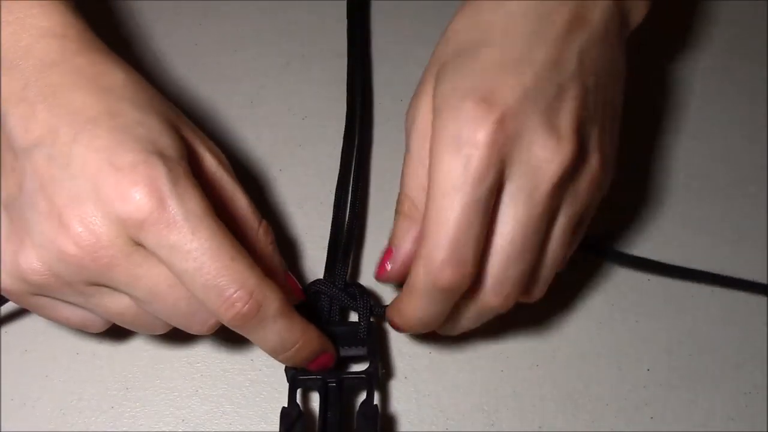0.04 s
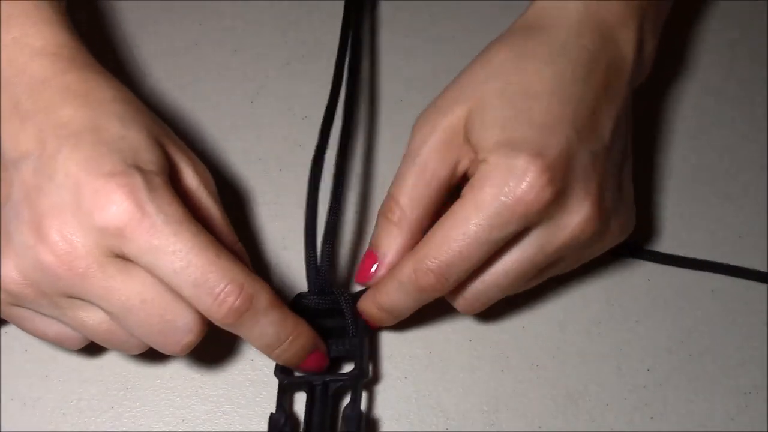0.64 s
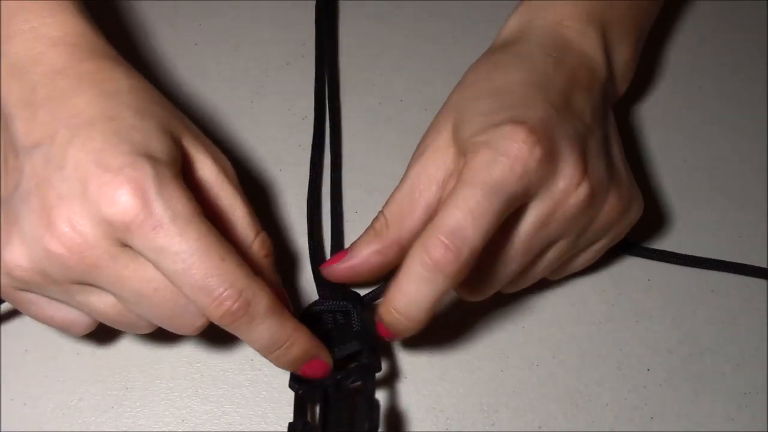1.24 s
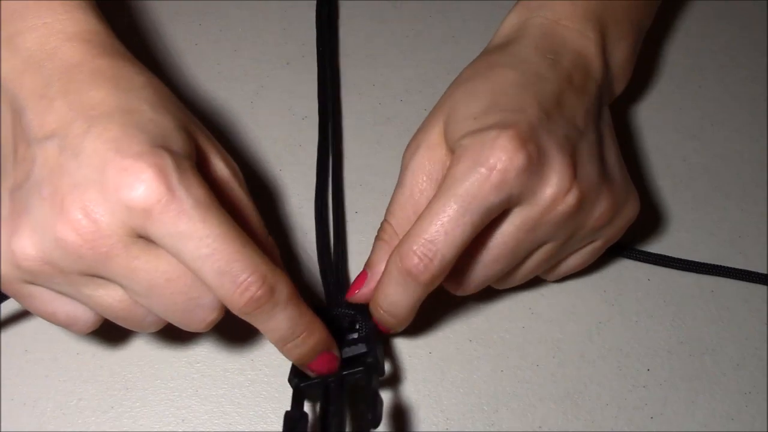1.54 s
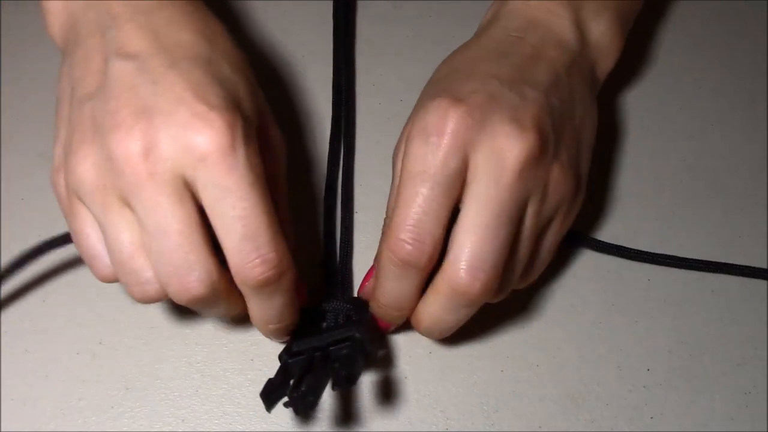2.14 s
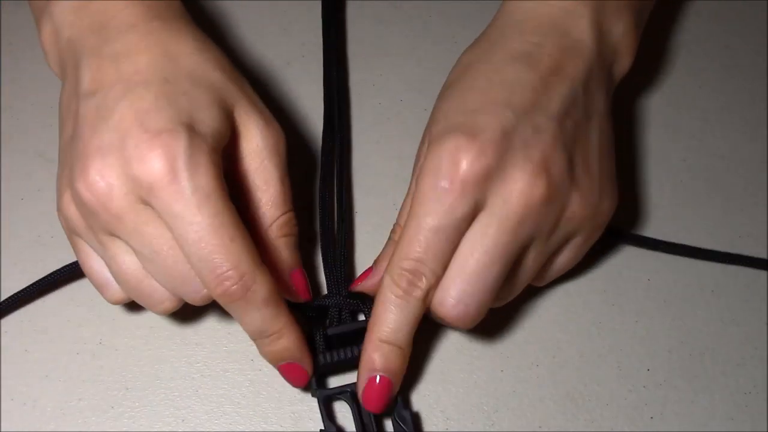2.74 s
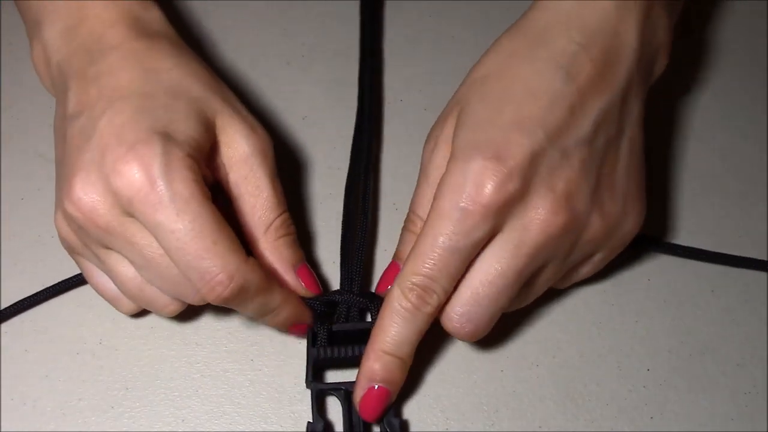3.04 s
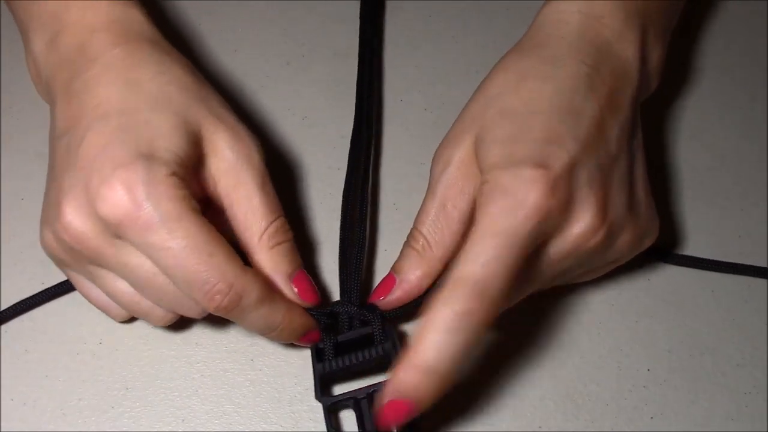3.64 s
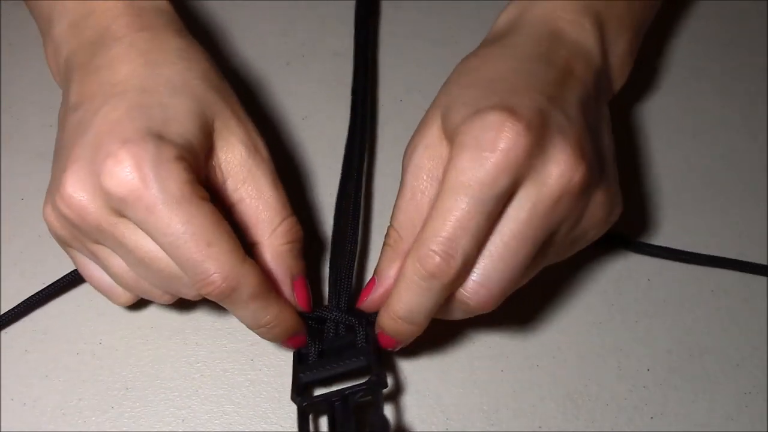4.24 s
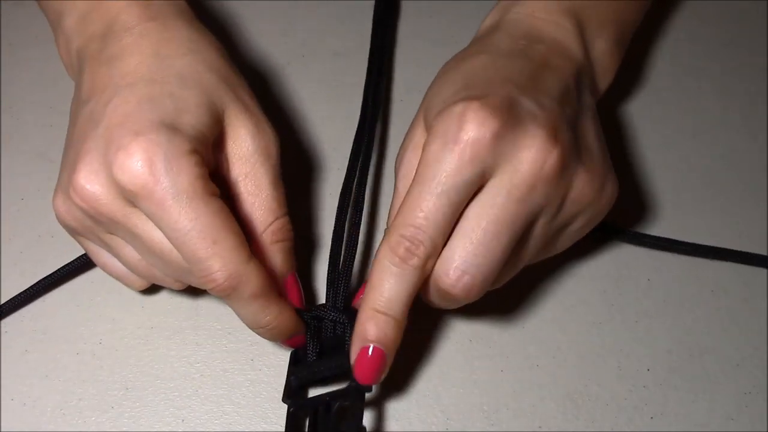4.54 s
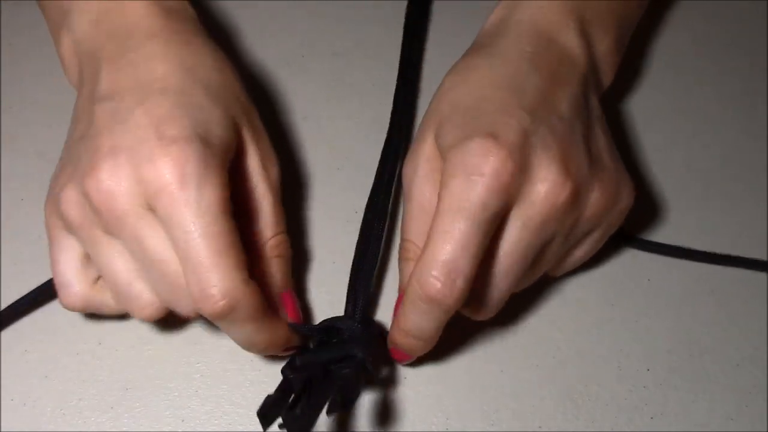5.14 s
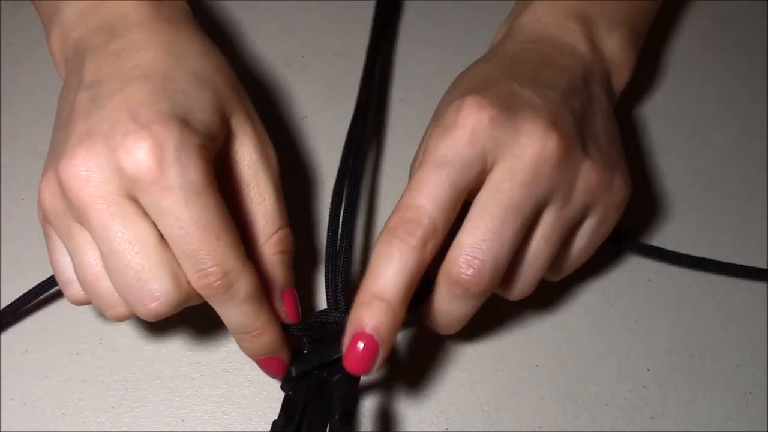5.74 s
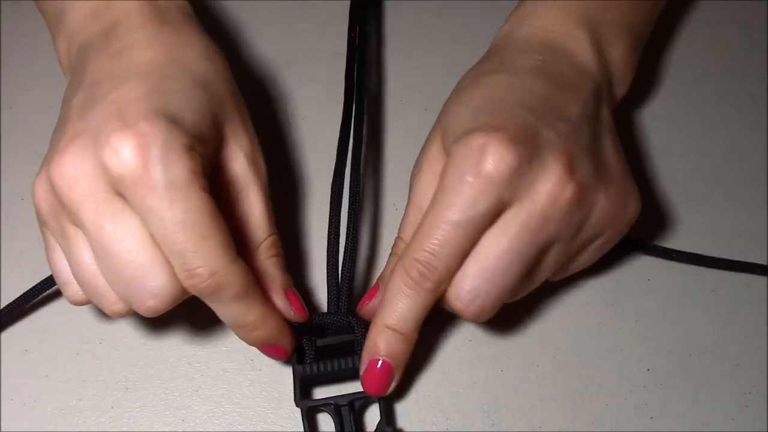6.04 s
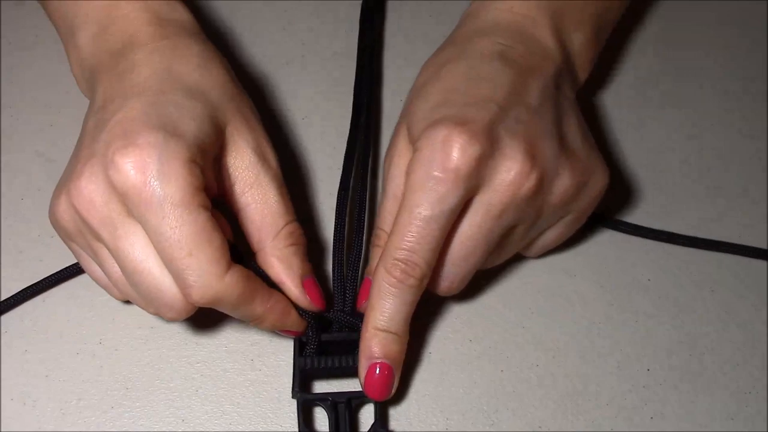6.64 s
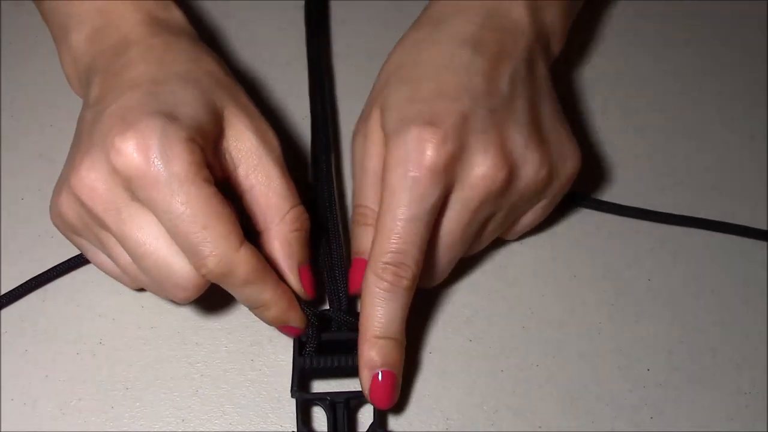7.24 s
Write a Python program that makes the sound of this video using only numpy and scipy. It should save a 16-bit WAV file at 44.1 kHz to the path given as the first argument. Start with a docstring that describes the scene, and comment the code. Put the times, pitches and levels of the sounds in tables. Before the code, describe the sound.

A short rasp of nylon cord and a soft finger bump open the sound, close by, over the faint hush of a small room. The cord keeps rubbing across a table and a plastic buckle in short, uneven strokes, hissing as it tightens and sometimes taking on a hollow, singing tone. Light buckle ticks and tiny flicks of snagged strands are scattered between the strokes. At about 2 seconds, a cluster of clicks comes with a hard finger landing that makes the tabletop boom briefly. A sharp plastic click follows near 2.7 seconds, then more scraping and ticking around 3.8. At about 4.7 seconds the cord zips taut, and at 5 the buckle drops flat with a bright slap and a few small ticks. More rubbing comes near 5.8 seconds, a softer table boom at 6.6 and another rasp at 6.8, with faint handling until about 7.5.

```python
"""First comes a short rasp of nylon cord and a soft finger bump, over the hush of a small quiet room.
Hands are knotting the cord onto a plastic buckle that lies on a table. The braid rasps as it catches
on table and buckle, sings where it is gripped, and hisses as it is drawn tight. The buckle ticks
against nails and table top, strands snag and flick free, and two hard finger landings make the table
boom. About five seconds in, just after a taut pull, the buckle drops flat with a bright slap."""
import sys
import numpy as np
from scipy import signal
from scipy.fft import rfft, irfft
from scipy.io import wavfile

SR = 44100
rng = np.random.default_rng(int(sys.argv[2]) if len(sys.argv) > 2 else 0)


def store_wav(level_fs):
    """Save 16-bit WAV to argv[1]."""
    pcm = np.round(np.clip(np.atleast_2d(level_fs), -1, 1) * 32767)
    wavfile.write(sys.argv[1], SR, pcm.T.astype(np.int16))


N = 330730


def amp(db):
    """Turns decibels into a number to multiply a sound by."""
    return 10 ** (np.asarray(db) / 20)


def value_at(points, hz):
    """Looks up a table's value at any frequency, blending between its rows on a log scale."""
    row_hz, value = np.transpose(points)
    return np.interp(np.log(hz + 1), np.log(row_hz + 1), value)


def add(mix, start_s, sound):
    """Lays a sound into the mix at its start time."""
    part = mix[round(start_s * SR):][:len(sound)]
    part += sound[:len(part)]


def unit_level(x):
    """Scales a sound so that its average level (rms) is 1."""
    return x / np.sqrt(np.mean(x ** 2) + 1e-20)


def unit_hit(x):
    """Scales a short sound to the energy of 10 ms at level 1."""
    return x / np.sqrt(np.sum(x ** 2) / (SR / 100) + 1e-20)


def lows(x, edge_hz):
    """Keeps the part of a sound below this frequency."""
    hz = np.fft.rfftfreq(N, 1 / SR)
    return irfft(rfft(x) / (1 + (hz / edge_hz) ** 6), N)


def thinned(x, edge_hz):
    """Weakens the bass: a brief hard contact gives little push below this frequency."""
    return signal.lfilter(*signal.butter(1, edge_hz, "high", fs=SR), x)


def through(x, colour, modes=(), size=4096):
    """Plays x through an object with a colour (its bass and treble) and modes (pitches where it rings)."""
    hz = abs(np.fft.fftfreq(size, 1 / SR))
    lift_db = sum(lift / (1 + (2 * (hz - centre) / width) ** 2) for centre, width, lift in modes)
    log_gain = np.log(amp(value_at(colour, hz) + lift_db))
    spectrum = np.exp(np.conj(signal.hilbert(log_gain)))  # makes the ringing come after the push
    response = np.fft.ifft(spectrum).real[:size // 2]
    return signal.oaconvolve(x, response)[:len(x)]


def near_echo(x, delay_s, echo_db):
    """A surface close by throws the sound straight back, which makes it hollow."""
    samples = np.arange(len(x))
    echo = np.interp(samples - delay_s * SR, samples, x, left=0)
    return (x + amp(echo_db) * echo) / np.sqrt(1 + amp(echo_db) ** 2)


def wander(rate_hz):
    """A smooth random wobble that changes up to about this fast."""
    return unit_level(lows(rng.standard_normal(N), rate_hz))


def friction(slips_per_s, spread_db, smooth, uneven_db, uneven_hz):
    """Tiny slips of unequal size over a smooth rub, bunched up as the grip catches and lets go."""
    sizes = amp(spread_db * np.minimum(rng.exponential(1, N), 4)) * rng.choice([-1, 1], N)
    slips = unit_level(sizes * (rng.random(N) < slips_per_s / SR))
    rub = smooth * rng.standard_normal(N)
    return (slips + rub) * amp(uneven_db * wander(uneven_hz))


def gestures(rows, column, rise_s, fall_s, idle_db, drift_db=5.5):
    """Loudness over time: each move swells, holds and fades, and the hands are never quite still."""
    t = np.arange(0, N, 32) / SR
    power = amp(idle_db + drift_db * wander(rate_hz=10.3)[::32]) ** 2
    for row in rows:
        peak_s, held_s = row[:2]
        early, late = np.maximum(peak_s - t, 0), np.maximum(t - peak_s - held_s, 0)
        power += (amp(row[column]) * np.exp(-early / rise_s - late / fall_s)) ** 2
    return np.interp(np.arange(N) / SR, t, np.sqrt(power))


def contact(t, chatter, chatter_s):
    """One sharp blow, then a brief chatter of the two surfaces."""
    rattle = rng.standard_normal(len(t)) * np.exp(-t / chatter_s)
    return (t == 0) + chatter * rattle / np.linalg.norm(rattle)


# Strokes of the cord. Each row: time it reaches full speed in seconds, seconds held,
# relative level on the table in dB, relative level on the buckle in dB.
STROKES = [(0.0, 0.0086, -40, -46.5), (0.17, 0.029, -49, -46), (0.23, 0.15, -58.5, -58),
           (0.43, 0.12, -43.5, -47), (0.628, 0.012, -65, -49), (0.68, 0.19, -42.5, -50.5),
           (0.82, 0.076, -34, -43), (1.2, 0.19, -45.5, -62), (1.75, 0.15, -47.5, -56.5),
           (1.985, 0.03, -30.5, -30.5), (2.04, 0.079, -42, -44), (2.19, 0.093, -45.5, -50.5),
           (2.57, 0.15, -44.5, -67), (2.862, .24, -36.5, -42), (3.183, 0.0099, -49, -39),
           (3.225, 0.017, -42, -66), (3.71, 0.078, -50, -47.5), (3.805, 0.0085, -38, -54),
           (3.87, 0.013, -31, -34.5), (3.96, 0.16, -47, -55.5), (4.275, 0.033, -37, -48),
           (4.46, 0.0052, -38.5, -54), (4.59, 0.15, -42, -49), (4.7, 0.12, -36.5, -43),
           (4.84, 0.072, -45, -56), (4.925, 0.036, -38, -43), (4.985, 0.0098, -27, -30),
           (5.04, 0.0077, -26, -30.5), (5.16, 0.011, -33, -48), (5.24, 0.04, -61, -43),
           (5.3, 0.091, -35, -41), (5.475, 0.0056, -38, -36), (5.52, 0.056, -38, -53.5),
           (5.74, 0.012, -31, -41.5), (5.81, 0.11, -34.5, -41), (6.125, 0.0065, -49.5, -74),
           (6.525, 0.0091, -45.5, -52.5), (6.78, 0.091, -38, -44.5), (6.835, 0.095, -30, -48.5),
           (7.275, 0.012, -37, -45), (7.47, .03, -58, -57)]
# Nylon sliding on nylon. Each row: time at full speed in seconds, seconds held, relative level in dB.
SLIDES = [(0.2, .02, -72), (0.35, 0.12, -67), (1.28, 0.014, -61), (1.72, .08, -69), (1.955, 0.082, -57),
          (2.24, 0.047, -65.5), (2.42, 0.006, -65.5), (3.68, 0.1, -63), (3.8, 0.075, -58),
          (4.325, .01, -67), (4.625, 0.013, -64.5), (4.72, 0.052, -64), (4.972, .015, -60),
          (5.32, 0.042, -58), (5.47, 0.018, -61), (5.83, 0.054, -81), (6.74, 0.12, -62), (7.29, 0.031, -68)]
# The colours of table top, buckle and fibres. Each row: frequency in Hz, relative level in dB.
TABLE_COLOUR = [(90, -47.5), (290, -11), (370, 4), (490, -4.5), (700, -5.5), (1000, -8.5), (1400, -20),
                (2100, -18.5), (4000, -34), (16000, -65)]
BUCKLE_COLOUR = [(600, -43), (1300, -9.5), (1600, 4.5), (2100, -1.5), (3200, -12.5), (5000, -19.5),
                 (7400, -29), (10000, -44), (16000, -60)]
FIBRE_COLOUR = [(1500, -44), (4000, -8), (6500, 7), (8500, 8.5), (11000, 3.5), (13500, -5), (16000, -12)]
# Where the table, the buckle and a lightly held cord ring.
# Each row: pitch in Hz, width in Hz, boost in dB (a cut if below zero).
TABLE_MODES = [(294.3, 10.5, 13), (451.6, 59, 5.5), (598, 140, 4), (809, 57, 3.5), (1100, 106, 7),
               (1318, 178, 14), (3600, 290, -16)]
BUCKLE_MODES = [(1250, 49, 14), (1600, 520, 10), (1880, 47, 8), (2334, 140, 5.5), (2720, 480, 7.5),
                (3810, 1300, 11), (5600, 340, -1)]
HOLLOW_MODES = [(600, 120, 3.5), (840, 62, 2.5), (1090, 220, 2)]


def rasping_cord():
    """The braid catches on table and buckle in tiny slips, and its fibres hiss."""
    braid = friction(slips_per_s=2200, spread_db=1.5, smooth=1.0, uneven_db=2.0, uneven_hz=120)
    fine = friction(slips_per_s=4000, spread_db=2.0, smooth=1.0, uneven_db=2.0, uneven_hz=120)
    on_table = gestures(STROKES, column=2, rise_s=0.015, fall_s=0.021, idle_db=-58.5)
    on_buckle = gestures(STROKES, column=3, rise_s=0.015, fall_s=0.021, idle_db=-64)
    on_nylon = gestures(SLIDES, column=2, rise_s=0.031, fall_s=0.02, idle_db=-86.5)
    rasp = unit_level(through(braid, TABLE_COLOUR, TABLE_MODES))
    # Only a heavy stroke stirs the table's low notes; a light one stays thin and hollow.
    lightness = 1 - np.clip(on_table / amp(-26), 0, 1)
    flat_colour = [(0, 0), (SR / 2, 0)]
    hollow = through(rasp - lows(rasp, edge_hz=406), flat_colour, HOLLOW_MODES)
    table = ((1 - lightness) * rasp + lightness * hollow) * on_table * amp(-0.5)
    scrape = through(0.5 * braid + 1.46 * fine, BUCKLE_COLOUR, BUCKLE_MODES)
    buckle = unit_level(scrape) * on_buckle * amp(-0.8)
    brushing = np.hypot(on_nylon, on_buckle * amp(-27.5))  # the buckle also brushes the fibres
    fibres = unit_level(through(fine, FIBRE_COLOUR)) * brushing * amp(1)
    return near_echo(table + buckle + fibres, delay_s=0.00186, echo_db=-23.5)


# Fingertips pressing on the table. Each row: landing time in seconds, seconds held, relative level in dB.
PRESSES = [(0.0, .01, -38.5), (0.18, 0.019, -33.5), (0.26, 0.016, -45.5), (0.55, 0.26, -52),
           (0.82, 0.14, -48), (1.27, 0.043, -49.5), (1.66, 0.012, -42), (1.696, 0.0069, -37),
           (1.78, 0.18, -50.5), (2.02, 0.025, -31), (2.08, 0.034, -32.5), (2.25, 0.015, -36.5),
           (2.39, 0.0061, -39.5), (2.425, 0.017, -36), (2.69, 0.029, -46), (2.86, 0.19, -45),
           (3.04, 0.0093, -38), (3.21, 0.015, -42.5), (3.619, 0.011, -39.5), (3.742, 0.035, -39),
           (3.786, .006, -28), (3.86, 0.083, -43.5), (4.01, 0.032, -38.5), (4.455, 0.079, -47.5),
           (4.56, 0.14, -45.5), (5.0, 0.062, -33.5), (5.3, 0.091, -36.5), (5.47, 0.07, -37),
           (5.76, 0.18, -49), (5.915, 0.0071, -39), (5.989, 0.0043, -41), (6.619, 0.0058, -42.5),
           (6.84, 0.053, -47), (7.42, 0.11, -49)]
# The dull colour of a fingertip on the table. Each row: frequency in Hz, relative level in dB.
THUMP_COLOUR = [(30, -34), (70, -18), (100, -2), (240, 0.5), (330, 1), (430, -9.5), (600, -16), (1500, -35),
                (16000, -100)]


def fingers():
    """Soft fingertips land quickly and settle slowly, sounding the low notes of the table."""
    bumps = friction(slips_per_s=300, spread_db=1.5, smooth=0.7, uneven_db=1.2, uneven_hz=30)
    weight = gestures(PRESSES, column=2, rise_s=0.0078, fall_s=0.02, idle_db=-58.5)
    return unit_level(through(bumps, THUMP_COLOUR, TABLE_MODES)) * weight * amp(-0.24)


# The colours of the room's air and of a faint hiss. Each row: frequency in Hz, relative level in dB.
AIR_COLOUR = [(20, -28), (55, -14), (100, -6), (160, 4.5), (300, 1), (600, -4), (1050, -8), (1350, -12),
              (1600, -17.5), (2200, -13.5), (4500, -18.5), (9000, -24.5), (12000, -27.5), (16000, -37)]
HISS_COLOUR = [(25, -44), (120, 2), (500, 1.5), (2000, -11), (6000, -21), (12000, -38.5)]
# A faint hum and two high whines. Each row: pitch in Hz, level in dB.
HUM = [(290.7, -77), (5561, -78), (11047, -83)]


def room_tone(air_db=-56, hiss_db=-62):
    """Steady dull air noise, a hiss that is opposite in left and right, and a wavering hum and whine."""
    air = unit_level(through(rng.standard_normal(N), AIR_COLOUR)) * amp(air_db)
    hiss = unit_level(through(rng.standard_normal(N), HISS_COLOUR)) * amp(hiss_db)
    t, hum = np.arange(N) / SR, np.zeros(N)
    for hz, db in HUM:
        waver = 1.8 * wander(rate_hz=13)
        hum += amp(db) * np.sqrt(2) * np.sin(2 * np.pi * hz * t + waver)
    return air + np.array([hiss, -hiss]) + hum


# The colours of a plastic crack and of its highest part. Each row: frequency in Hz, relative level in dB.
CRACK_COLOUR = [(300, -55), (900, -26), (1300, 12.5), (1800, 7), (2300, 9), (3000, 7.5), (3700, 5),
                (4600, -6), (6000, -8.5), (7200, -25.5), (16000, -48)]
CRACK_TOP_COLOUR = [(2500, -53), (6000, -7), (7800, -0.5), (9300, -1), (11000, -11), (13000, -11),
                    (14500, -28), (16000, -9)]


def crack(force, brightness_db):
    """Hard plastic answers a blow with a bright click and a fine, high edge."""
    click = unit_hit(through(force, CRACK_COLOUR)) * amp(4.5)
    edge = unit_hit(through(force, CRACK_TOP_COLOUR)) * amp(brightness_db - 7)
    return click + edge


# The buckle tapping nails and table. Each row: start in seconds, then relative levels in dB of the thud,
# the table's knock, the buckle's ring, the crack and the crack's brightness, then the ring's pitch in Hz.
TICKS = [(0.1626, -23, -28, -26, -42, -5, 1600), (0.8127, -33, -32, -32, -45.5, -17, 1510),
         (0.817, -40, -24.5, -53, -55, -23, 1600), (0.8864, -30.5, -33, -33.5, -50.5, -4, 1780),
         (1.0147, -43, -49, -42, -61, -19, 1600), (1.0434, -67, -39.5, -51, -62, -20, 1650),
         (1.268, -40, -31, -44, -46, -16, 1700), (1.5519, -42.5, -52, -49, -63, -19, 1670),
         (1.6604, -47, -45.5, -43.5, -71, -21, 1600), (1.968, -31, -32, -28.5, -40, 0, 2000),
         (1.9717, -25, -30.5, -23, -42, -31, 1860), (2.02, -28, -32, -50, -35.5, -5, 1720),
         (2.1443, -60, -39.5, -41, -62, 3, 1690), (2.188, -35, -36.5, -54, -57.5, -18, 1920),
         (2.5252, -37, -34, -31, -46, -10, 1620), (2.648, -42, -42, -37, -47, -12, 1600),
         (2.6523, -53, -31.5, -33.5, -57, -21, 1560), (2.7478, -26, -28.5, -14, -18.5, -5.5, 1630),
         (3.0385, -39, -44, -33, -48, 0, 1630), (3.7435, -37, -43, -49, -50.5, -8, 1500),
         (3.803, -39, -38, -29, -46, -11, 1850), (3.8076, -32, -30, -24, -38, -19, 1670),
         (3.8546, -32, -50, -29.5, -42.5, -5, 1780), (4.0798, -39, -26, -35, -43, -36, 1660),
         (4.193, -69, -39, -47, -69, -25, 1600), (4.2645, -66, -32.5, -67, -59.5, -25, 1500),
         (4.5661, -40, -34, -37, -48.5, -12, 1700), (4.6312, -54, -49, -61, -44.5, -14, 1650),
         (4.9855, -23.5, -14.5, -33, -21.5, -4, 1620), (5.2303, -29.5, -35.5, -34, -39.5, 1.5, 1650),
         (5.2717, -27.5, -30.5, -27.5, -42, -11, 1860), (5.3193, -50, -59, -26.5, -44, -7, 1710),
         (5.343, -28.5, -31.5, -33, -52, 12.5, 1660), (5.386, -56, -43, -32, -64, -17, 1860),
         (5.8429, -38, -27, -27.5, -44.5, -9, 1600), (6.3922, -42, -42.5, -26, -49, -10, 1620),
         (6.62, -37, -48, -43, -57, 6.5, 1630), (7.1107, -47, -48, -32, -57, -24, 1625),
         (7.474, -42.5, -46, -38, -66, -23, 1600)]


def buckle_ticks(ring_s=0.00085):
    """Each tap thuds, knocks, rings and cracks. Gives the direct sound and the sound sent to the room."""
    direct, to_room, t = np.zeros(N), np.zeros(N), np.arange(4096) / SR
    ring_shape = t / ring_s * np.exp(-t / ring_s)  # swells fast, then the fingers damp it
    for start_s, thud_db, knock_db, ring_db, crack_db, brightness_db, ring_hz in TICKS:
        thud = through(contact(t, chatter=1.2, chatter_s=0.02), THUMP_COLOUR, TABLE_MODES)
        thud = unit_hit(thinned(thud, edge_hz=113)) * amp(thud_db)
        knock = through(contact(t, chatter=1.58, chatter_s=0.011), TABLE_COLOUR, TABLE_MODES)
        knock = unit_hit(thinned(knock, edge_hz=890)) * amp(knock_db)
        ring = unit_hit(ring_shape * np.sin(2 * np.pi * ring_hz * t)) * amp(ring_db - 2)
        snap = crack(contact(t, chatter=1.0, chatter_s=0.0024), brightness_db)
        snap = near_echo(snap, delay_s=0.00166, echo_db=-18.5) * amp(crack_db)
        add(direct, start_s, thud + knock + ring + snap)
        # The room gathers the crack from all sides, so its chatter evens out; the hands shield the ring.
        clean_snap = crack(1.0 * (t == 0), brightness_db) * amp(crack_db)
        add(to_room, start_s, thud + knock + ring * amp(-5) + clean_snap)
    return direct, to_room


# Moments when the cord sings. Each row: time at full speed in seconds, seconds held,
# relative level in dB, pitch in Hz, width of the band of noise in Hz.
SINGS = [(0.44, .12, -39.5, 580, 68), (0.67, 0.14, -46.5, 605, 90), (0.44, 0.12, -46, 1103, 140),
         (0.72, 0.12, -48.5, 1500, 148), (2.766, 0.019, -52, 5430, 2200), (2.88, 0.17, -40, 1090, 170),
         (3.185, 0.013, -37, 1640, 260), (3.182, 0.014, -42.5, 2170, 420), (4.275, 0.039, -39.5, 1060, 190),
         (4.275, 0.045, -42, 600, 110), (4.711, 0.12, -47, 990, 120), (4.619, 0.017, -54, 6700, 2000),
         (5.31, 0.056, -59, 9200, 2200), (5.745, 0.11, -34, 417, 129), (5.85, .07, -39.5, 1180, 400),
         (6.81, 0.065, -41, 1100, 240), (6.81, 0.082, -51.5, 3380, 550), (6.811, 0.072, -62, 5500, 600)]


def singing_cord(rise_s=0.018, fall_s=0.0081, size=32768):
    """Gripped by a loop or cupped fingers, the sliding cord sings in one band that swells with speed."""
    out, hz = np.zeros(N), np.fft.rfftfreq(size, 1 / SR)
    lead_s = size / 4 / SR  # leaves time to swell before full speed
    t = np.arange(size) / SR - lead_s
    for peak_s, held_s, db, centre_hz, width_hz in SINGS:
        band = 1 / (1 + (2 * (hz - centre_hz) / width_hz) ** 4)
        tone = unit_level(irfft(rfft(rng.standard_normal(size)) * np.sqrt(band), size))
        speed = np.exp(np.minimum(t, 0) / rise_s - np.maximum(t - held_s, 0) / fall_s)
        add(out, peak_s - lead_s, tone * speed * amp(db))
    return out


# Strands snagging. Each row: start in seconds, relative level in dB.
SNAGS = [(0.756, -62), (0.77, -63), (1.084, -60.5), (2.2373, -57), (2.257, -50), (3.8668, -50),
         (3.9265, -53), (4.3245, -54)]
# Their crisp colour. Each row: frequency in Hz, relative level in dB.
SNAG_COLOUR = [(1500, -9), (4000, -2), (9000, -4), (16000, -23)]


def snags():
    """Single strands catch on an edge and flick free."""
    out, t = np.zeros(N), np.arange(2048) / SR
    for start_s, db in SNAGS:
        flick = through(contact(t, chatter=1.0, chatter_s=0.0027), SNAG_COLOUR)
        add(out, start_s, unit_hit(flick) * amp(db))
    return out


# Hard landings of a finger. Each row: start in seconds, relative level in dB.
BOOMS = [(2.02, -27), (6.621, -41.5)]


def table_booms(hz=294.6, rise_s=0.0048, fall_s=0.04):
    """The heel of a finger lands hard, and the table top rings on at its lowest note."""
    out, t = np.zeros(N), np.arange(16384) / SR
    shape = (1 - np.exp(-t / rise_s)) * np.exp(-t / fall_s)
    ring = shape * np.sqrt(2) * np.sin(2 * np.pi * hz * t)
    for start_s, db in BOOMS:
        add(out, start_s, ring * amp(db))
    return out


# The rise and fall of one fast pull through the loop. Each row: time in seconds, relative level in dB.
PULL_LEVELS = [(4.62, -61), (4.69, -37), (4.74, -30.5), (4.775, -30.5), (4.805, -34.5), (4.845, -62)]
# The colour of the taut cord. Each row: frequency in Hz, relative level in dB.
TAUT_COLOUR = [(500, -35), (950, 1.5), (1500, -6), (2400, -10), (3400, -14), (6000, -31.5), (13000, -41),
               (16000, -51)]
# Where the taut cord rings. Each row: pitch in Hz, width in Hz, boost in dB.
TAUT_MODES = [(1270, 43, 14), (1860, 180, 13.5), (2700, 180, 5), (4540, 640, 8), (11000, 1800, 12.5)]


def taut_pull():
    """Pulled tight, the weave slips fast and evenly, and zips at a few pitches."""
    weave = friction(slips_per_s=1700, spread_db=-1.0, smooth=0.4, uneven_db=1.6, uneven_hz=180)
    t = np.arange(N) / SR
    times, levels_db = np.transpose(PULL_LEVELS)
    pulling = (t > times[0]) & (t < times[-1])
    loudness = amp(np.interp(t, times, levels_db)) * pulling
    return unit_level(through(weave, TAUT_COLOUR, TAUT_MODES)) * loudness


# The bright colour of the slap. Each row: frequency in Hz, relative level in dB.
SLAP_COLOUR = [(7000, -22), (11000, -1), (14000, 0), (16000, -20)]


def buckle_slap(start_s=4.9853, db=-36):
    """The buckle drops, and its flat side meets the table all at once."""
    out, t = np.zeros(N), np.arange(2048) / SR
    slap = through(contact(t, chatter=0.6, chatter_s=0.0015), SLAP_COLOUR)
    add(out, start_s, unit_hit(slap) * amp(db))
    return out


# How long the room echoes. Each row: frequency in Hz, seconds it takes to fade by 60 dB.
ROOM_FADE = [(150, 0.15), (500, 0.33), (1600, 0.26), (4000, 0.2), (6000, 0.32), (12000, 0.088)]


def room_echoes(x, middle_db, side_db, echoes_per_s=3000):
    """Scattered echoes fade at each frequency's own pace, nearly the same in left and right."""
    size = SR // 2
    echoes = rng.choice([-1., 1.], (2, size)) * (rng.random((2, size)) < echoes_per_s / SR)
    echoes *= np.arange(size) / SR > 0.005  # nothing comes back in the first 5 ms
    hz, t, bands = signal.stft(echoes, SR, nperseg=256)
    fade = amp(-60 * t / value_at(ROOM_FADE, hz)[:, None])
    tails = signal.istft(bands * fade, SR, nperseg=256)[1]
    middle, side = signal.fftconvolve(x[None], tails / np.linalg.norm(tails[0]), axes=1)[:, :N]
    return amp(middle_db) * middle + amp(side_db) * np.array([side, -side])


def scene():
    """Mixes the rubbing, the taps and their echoes over the room's quiet tone."""
    rubbing = (rasping_cord() + taut_pull() + singing_cord() + fingers() + snags()) * amp(-0.92)
    ticks, ticks_to_room = buckle_ticks()
    echoes = room_echoes(rubbing, middle_db=-12, side_db=-31.5)
    echoes += room_echoes(ticks_to_room, middle_db=-13.5, side_db=-29)
    return rubbing + ticks + buckle_slap() + table_booms() + echoes + room_tone()


def record(dry):
    """Removes the very highest treble, above 15900 Hz."""
    treble_cut = signal.firwin(255, 15900, window=("kaiser", 9), fs=SR)
    return signal.oaconvolve(dry, treble_cut[None], "same")


dry = scene()
out = record(dry)
store_wav(out)
```